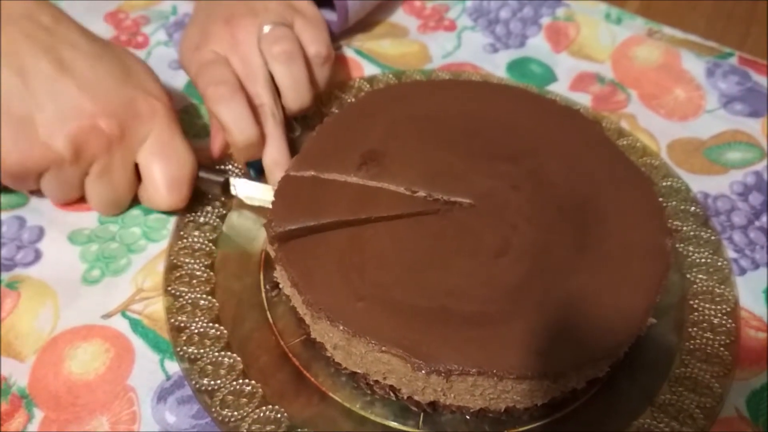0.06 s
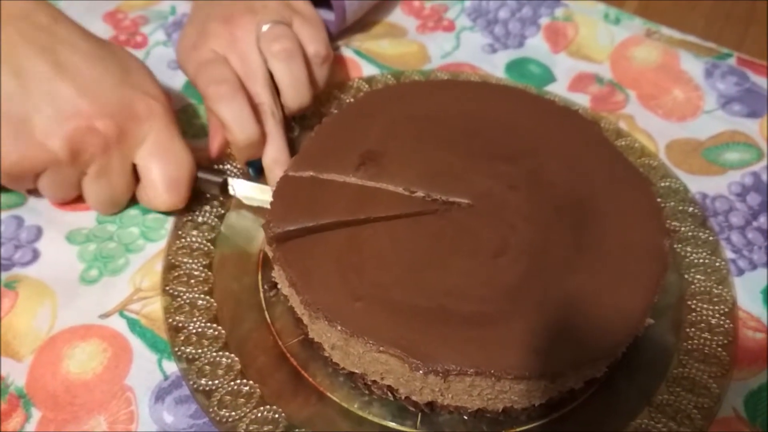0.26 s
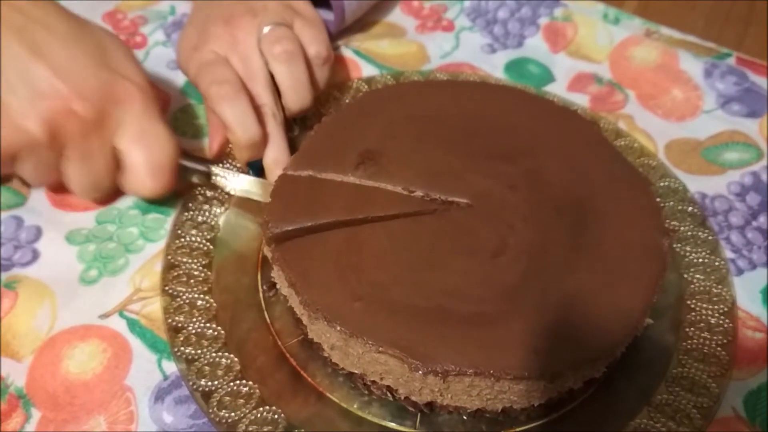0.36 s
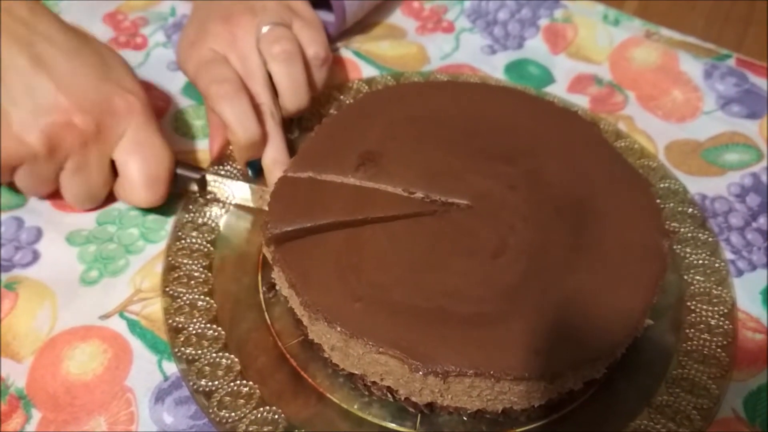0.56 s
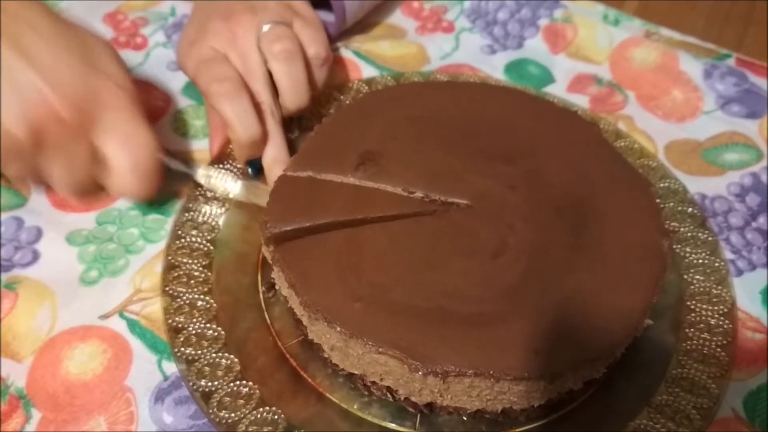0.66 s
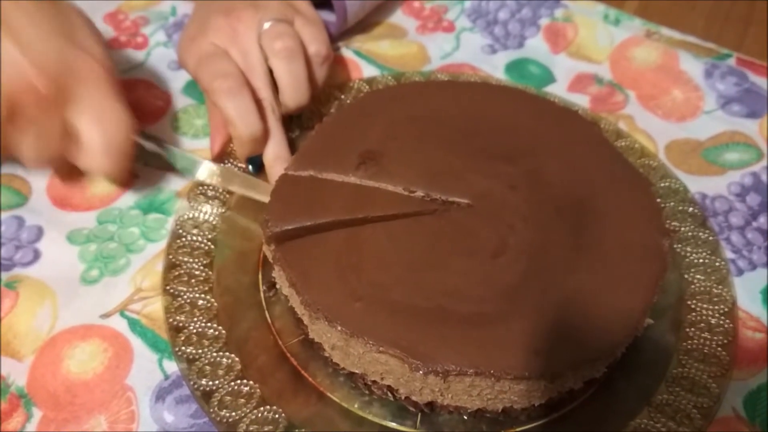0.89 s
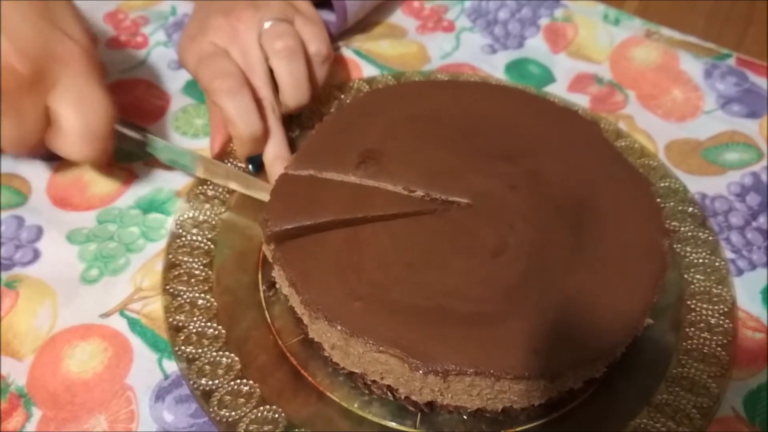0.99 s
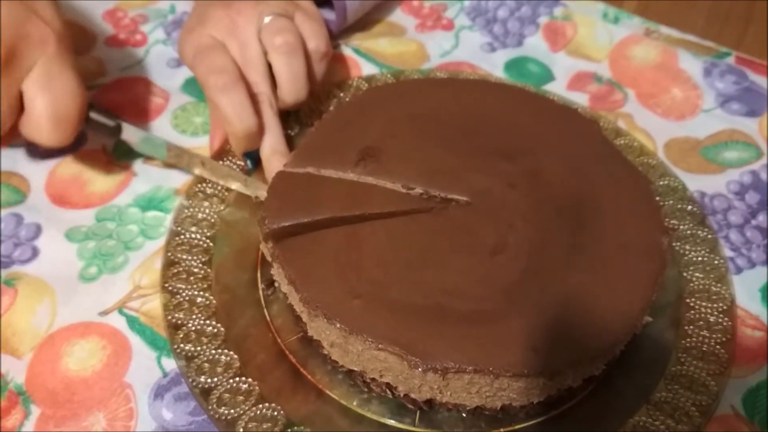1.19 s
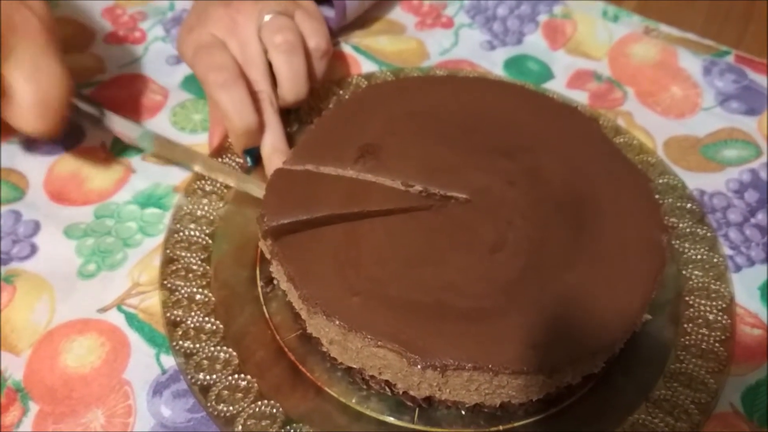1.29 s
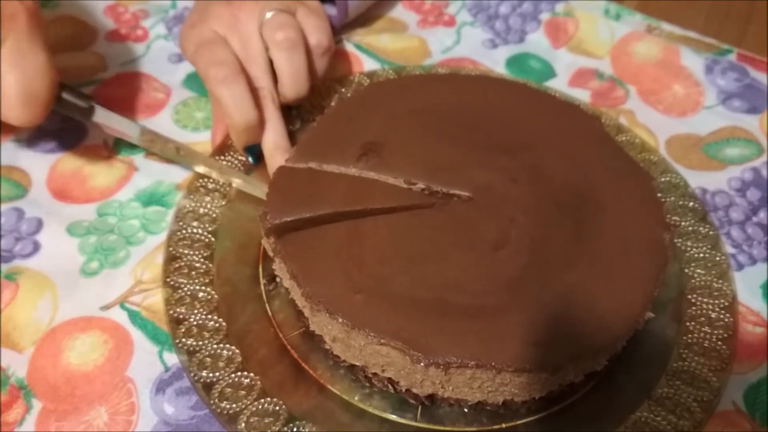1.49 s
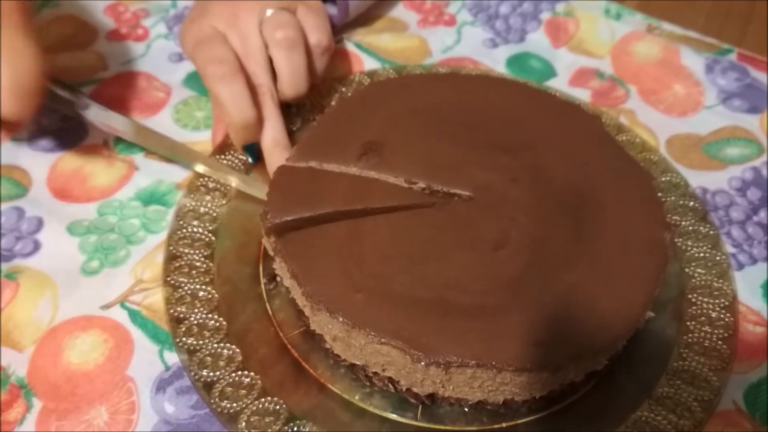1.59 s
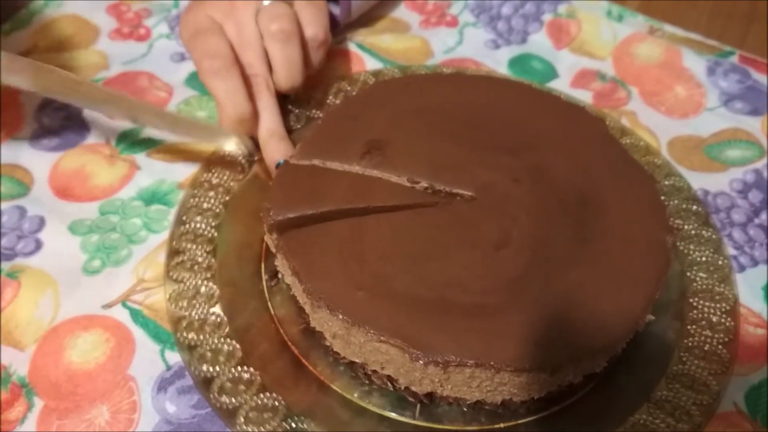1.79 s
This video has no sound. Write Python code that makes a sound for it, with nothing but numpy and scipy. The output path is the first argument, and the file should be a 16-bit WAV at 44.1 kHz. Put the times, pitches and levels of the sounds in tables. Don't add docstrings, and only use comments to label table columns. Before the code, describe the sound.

A knife crunches through a crisp cake base, close up in stereo. Bright cracks and gritty crumbs start around 0.1 seconds, thickening to the heaviest crunch with a low thud at 0.5. After a short lull, snaps resume at 0.67, burst again at 1.0, and thin out by 1.45. Faint blade slides, tiny flakes and a distant knock near 1.7 follow, over low household rumble and short room reflections.

```python
import sys
import numpy as np
from scipy import signal
from scipy.fft import rfft, irfft, next_fast_len
from scipy.io import wavfile
from scipy.ndimage import uniform_filter1d, map_coordinates

SR = 44100
rng = np.random.default_rng(int(sys.argv[2]) if len(sys.argv) > 2 else 0)


def transcribe(signal):
    frames = np.atleast_2d(signal).T
    limited = np.clip(frames, -1, 1)
    pcm = np.round(limited * 32767).astype(np.int16)
    wavfile.write(sys.argv[1], SR, pcm)


def elevation(decibels):
    levels = np.asarray(decibels, float)
    return 10 ** (levels / 20)


N = 81585
RISE_S = 0.00039


def unit(x):
    return x / np.sqrt(np.mean(x ** 2) + 1e-20)


def along(points, hz):
    f, v = np.transpose(points)
    return np.interp(np.log(hz + 1), np.log(f + 1), v)


def level(rows):
    return elevation(np.interp(np.arange(N) / SR, *np.transpose(rows)))


def unit_gain(h):
    return h / np.sqrt(np.mean(np.abs(h) ** 2))


def filtered(x, response):
    size = next_fast_len(N + SR // 2)
    gain = unit_gain(response(np.fft.rfftfreq(size, 1 / SR)))
    return irfft(rfft(x, size) * gain, size)[..., :N]


def colour(points):
    return lambda hz: elevation(along(points, hz))


def ringing(peaks):
    def response(f):
        total = 0
        for k, (centre, width, db) in enumerate(peaks):
            damping = 1j * f * width
            total = total + (-1) ** k * elevation(db) * damping / (centre * centre - f * f + damping)
        return total
    return response


def wobble(rate):
    knots = rng.standard_normal(int(N * rate / SR) + 4)
    return map_coordinates(knots, [np.arange(N) * rate / SR])


def bursts(rows, rise_s):
    power, t = np.zeros(N + SR), np.arange(SR // 4) / SR
    for s, db, t60 in rows:
        fall = elevation(db - 60 * t / max(t60, .002))
        power[round(s * SR):][:len(t)] += (fall * (1 - np.exp(-t / rise_s))) ** 2
    return np.sqrt(power[:N])


def patchy(x, patchy_db, size=128):
    z = signal.stft(x, nperseg=size)[2]
    field = uniform_filter1d(rng.standard_normal(z.shape[1:]), 6, 0)
    field = uniform_filter1d(field, 4, 1)
    return signal.istft(z * elevation(patchy_db * unit(field)), nperseg=size)[1][:, :N]


# frequency in Hz, left minus right in dB.
LEFT_LEAN = [(200, 0.5), (700, -2), (2400, 3.5), (6000, -1), (9500, -5), (13000, -3)]
# frequency in Hz, likeness from 0 to 1.
LIKENESS = [(100, 0.87), (300, 0.87), (1000, 0.47), (12000, 0.057)]
LEFT_LAG_S, LAG_FROM_HZ = 0.0003355, 1675


def pair(env, blows=0):
    hz = np.fft.rfftfreq(N, 1 / SR)
    turn = np.arccos(np.clip(along(LIKENESS, hz), 0, 1)) / 2
    a, b = rfft(env * rng.standard_normal((2, N)))
    mid, side = a * np.cos(turn), b * np.sin(turn)
    sure = rfft(blows + np.zeros(N))
    lean = elevation(along(LEFT_LEAN, hz) / 2)
    lag = LEFT_LAG_S * (0.3 + 0.61 / (1 + (LAG_FROM_HZ / (hz + 1)) ** 6))
    left = (mid + side + sure) * lean * np.exp(-2j * np.pi * hz * lag)
    right = (mid - side + sure) / lean
    return irfft([left, right], N)


# frequency in Hz, level in dB per Hz.
RUMBLE_COLOUR = [(25, -29), (65, 1), (110, -5), (215, -6), (330, -9.5), (400, -28), (560, -39.5),
                 (700, -77.5)]
# frequency in Hz, level in dB per Hz.
HISS_COLOUR = [(350, -29), (500, 0), (900, -14.5), (1600, -18.5), (2700, -16.5), (16500, -16)]
# frequency in Hz, width in Hz, level in dB.
FAR_OBJECT = [(692, 110, 3), (1310, 290, -3.5), (2150, 350, -6.5), (2770, 360, -9.5), (3170, 300, -11)]
RUMBLE_DB, HISS_DB = -68.5, -89.5
KNOCK_S, KNOCK_DB, KNOCK_T60_S, KNOCK_LEAD_S, KNOCK_BLOW_DB = 1.702, -64.5, 0.26, 0.025, 23.5


def household():
    a, b = rng.standard_normal((2, N))
    rumble = filtered(np.array([a + b, a - 0.08 * b]), colour(RUMBLE_COLOUR))
    rumble = rumble * elevation(RUMBLE_DB + 0.67 * wobble(13))
    hiss = elevation(HISS_DB) * filtered(rng.standard_normal((2, N)), colour(HISS_COLOUR))
    after = np.arange(N) / SR - KNOCK_S
    scrape_db, echo_db = 20 * after / KNOCK_LEAD_S - 4, -60 * after / KNOCK_T60_S
    force = elevation(KNOCK_DB + np.where(after < 0, scrape_db, echo_db)) * rng.standard_normal((2, N))
    force[:, round(KNOCK_S * SR)] += elevation(KNOCK_DB + KNOCK_BLOW_DB)
    return rumble + hiss + filtered(force, ringing(FAR_OBJECT))


# frequency in Hz, time to fall 60 dB in seconds.
ROOM_DECAY = [(100, 0.12), (1000, 0.17), (12000, 0.042)]
ROOM_DB, WALL_S, ROOM_WIDE_HZ, ECHO_EACH_S = -11, 0.0048, 958, .04


def kitchen(x):
    out, size, mono = np.zeros((2, N + SR)), round(ECHO_EACH_S * SR), x.mean(axis=0)
    for start in range(0, N, size):
        hz, t, z = signal.stft(rng.standard_normal((2, SR // 4)), SR, nperseg=256)
        turn = np.arctan(hz / ROOM_WIDE_HZ + .1)[:, None] / 2
        mid, side = z[0] * np.cos(turn), z[1] * np.sin(turn)
        decay = elevation(-60 * t / along(ROOM_DECAY, hz)[:, None])
        tail = signal.istft(np.array([mid + side, mid - side]) * decay, SR, nperseg=256)[1]
        tail = tail / np.linalg.norm(tail[0])
        answer = signal.fftconvolve(mono[None, start:start + size], tail, axes=1)
        out[:, start + round(WALL_S * SR):][:, :answer.shape[1]] += answer
    return out[:, :N]


# start in seconds, peak level in dB, pitch in Hz.
HAND_PUSHES = [(0.126, -41, 132), (0.214, -31, 284), (0.324, -33, 239), (0.445, -33.5, 206.5),
               (0.517, -25.5, 164.6), (0.704, -38, 147), (0.808, -37, 181), (0.931, -41.5, 143),
               (0.95, -34, 183), (1.04, -40.5, 169), (1.149, -41.5, 227), (1.177, -39.5, 118),
               (1.247, -36.5, 247)]
THUD_CYCLES = 5.5
SWAY_HZ, SWAY_DB, SWAY_T60_S = 69, -18.5, 0.09


def table():
    out, t = np.zeros(N + SR), np.arange(SR // 4) / SR
    sway = elevation(SWAY_DB - 60 * t / SWAY_T60_S) * np.sin(2 * np.pi * SWAY_HZ * t)
    for s, db, hz in HAND_PUSHES:
        thud = elevation(-60 * t * hz / THUD_CYCLES) * np.sin(2 * np.pi * hz * t)
        out[round(s * SR):][:len(t)] += elevation(db) * (thud + sway) * (1 - np.exp(-t / 0.0022))
    return np.array([np.roll(out[:N], round(LEFT_LAG_S * SR)), out[:N]])


# time in seconds, level in dB.
SLIDE = [(0, -65.5), (.06, -79), (.08, -100), (1.45, -100), (1.52, -76.5), (1.57, -88), (1.6, -80),
         (1.64, -88), (1.655, -72.5), (1.715, -75.5), (1.75, -83.5), (1.85, -99)]
# frequency in Hz, width in Hz, level in dB.
BLADE_BANDS = [(2770, 450, -9), (5430, 960, -9), (7600, 700, -7.5), (9150, 380, -5.5), (10400, 600, -1.5),
               (11400, 380, 0), (12300, 700, -4.5), (13600, 630, -4.5), (15200, 400, -5.5)]
# start in seconds, peak level in dB.
LAST_FLAKES = [
    (1.5813, -67),
    (1.589, -60),
    (1.6755, -70),
    (1.7076, -68),
    (1.7226, -70),
]


def wipe():
    flakes = bursts([(s, db, .006) for s, db in LAST_FLAKES], RISE_S)
    thin = colour([(7000, -28), (11500, 1.5), (15500, -3.5), (16500, -30)])
    hiss = filtered(pair(level(SLIDE)), lambda hz: ringing(BLADE_BANDS)(hz) ** 2)
    return patchy(hiss, patchy_db=3.0) + filtered(pair(flakes), thin)


CRUMBS_PER_S, CRUMB_DB, CRUMB_S = 2500, 5, 0.0018


def crumbs():
    sizes = elevation(CRUMB_DB * np.minimum(rng.exponential(size=N), 2.5))
    hits = (rng.random(N) < CRUMBS_PER_S / SR) * sizes
    t = np.arange(SR // 50) / SR
    return unit(np.convolve(hits, np.exp(-t / CRUMB_S))[:N] + .5)


# peak time in seconds, level in dB, plate share in dB,
# swell in seconds, time to fall 60 dB in seconds.
LONG_TEARS = [(0.09, -61, -3, 0.037, 0.13), (0.124, -55.5, 3.5, 0.008, 0.11), (0.218, -39, -10, 0.02, 0.11),
              (0.377, -47.5, -4, 0.037, 0.21), (0.426, -52.5, 3.5, 0.019, 0.1),
              (0.469, -41, -12.5, 0.011, 0.017), (0.519, -33.5, -4, 0.03, 0.14),
              (0.711, -48.5, -6.5, 0.042, 0.086), (0.818, -64, 4.5, 0.23, 0.39),
              (0.873, -52.5, 6.5, 0.0018, 0.0106), (0.963, -69.5, 17, 0.035, 0.19),
              (1.017, -48.5, -6.5, 0.055, 0.14), (1.189, -60, 0, 0.1, 0.21), (1.427, -63.5, -9, 0.013, 0.3)]


def tears():
    t = np.arange(N) / SR
    s, db, share_db, swell, t60 = np.transpose(LONG_TEARS)[:, :, None]
    swell_db = 20 * (t - s) / np.maximum(swell, .002)
    fall_db = -60 * (t - s) / np.maximum(t60, .01)
    each = elevation(db + np.where(t < s, swell_db, fall_db))
    return each.sum(axis=0), (each * elevation(share_db)).sum(axis=0)


PLATE_DB, PLATE_HOLD_S, BLOW_DB = -4, 0.008, 18


def drive(cracks, load):
    s, db, share_db, t60 = np.transpose(cracks)
    blow_at = np.round((s + RISE_S) * SR).astype(int)
    blows = np.bincount(blow_at, elevation(db + share_db + BLOW_DB), N)
    shudder = bursts(np.transpose([s, db + share_db + PLATE_DB, t60 / 2 + PLATE_HOLD_S]), RISE_S)
    return pair(shudder + load * crumbs(), blows)


# frequency in Hz, width in Hz, level in dB.
FIRM_PLATE = [(600, 40, -8), (740, 70, -11), (878, 150, 0), (1065, 170, -2), (1335, 130, -6),
              (1580, 150, -7), (2140, 120, -15), (2500, 300, -15), (2840, 120, -15)]
# frequency in Hz, width in Hz, level in dB.
SLACK_PLATE = [(581, 210, -2.5), (696, 140, 1), (976, 410, -7), (2360, 510, -16.5)]
BITE_S = .19
DULL_DB = -4


def plate(cracks, load):
    firm = (cracks[:, 0] > BITE_S) & (cracks[:, 0] < DRAW_CRACKS[0][0])
    high = filtered(drive(cracks[firm], load / 2), ringing(FIRM_PLATE))
    low = elevation(DULL_DB) * filtered(drive(cracks[~firm], load), ringing(SLACK_PLATE))
    return patchy(high + low, patchy_db=1.2, size=512)


# frequency in Hz, level in dB per Hz.
CRACK_COLOUR = [(880, -20.5), (1500, -6.5), (2600, -12.5), (3740, -10), (6430, -2), (8680, -6),
                (12000, 6.5), (15200, -1), (16500, -50)]
# frequency in Hz, level in dB per Hz.
CRUMB_COLOUR = [(880, -43), (1500, -10.5), (2290, -3), (6050, -15), (11200, -5), (15900, -10),
                (16500, -43.5)]
CRACK_DB, SPIKY_DB = -1.5, 1.2


def crisp_base(cracks, grinding):
    snap = bursts(cracks[:, [0, 1, 3]], RISE_S) * elevation(CRACK_DB + SPIKY_DB * wobble(900))
    snaps = filtered(pair(snap), colour(CRACK_COLOUR))
    rustle = filtered(pair(grinding * crumbs()), colour(CRUMB_COLOUR))
    return patchy(snaps + rustle, patchy_db=1.5)


# start in seconds, peak level in dB, plate share in dB,
# time to fall 60 dB in seconds.
PUSH_CRACKS = [(.0015, -51.5, -26, .008), (.069, -73, 16.5, .02), (0.0725, -46, -11, .012),
               (0.0798, -47, -32, .017), (0.1078, -28, -48, .007), (0.1229, -46.5, -8.5, .01),
               (.1262, -32.5, -21, .008), (0.134, -37, -39, .007), (.166, -61, 10, .01),
               (0.173, -63, 5, .01), (0.1958, -32.5, -14, .012), (.2075, -39.5, -10, .015),
               (0.2167, -29, -8, .012), (.283, -60, 3, .01), (0.289, -59, 6.5, .01),
               (0.317, -51.5, -13.5, .01), (0.3472, -38.5, -20.5, .026), (0.3567, -40.5, -20.5, .02),
               (0.364, -45.5, -12, .015), (.3865, -48, -6, .008), (.399, -29, -9, .008),
               (.402, -38, -6, .008), (.42, -39.5, -2, .01), (0.4258, -41.5, -7.5, .008),
               (0.427, -46, -7.5, .008), (0.4445, -38.5, -12, .008), (0.4543, -35.5, 0, .015),
               (.464, -34, -11.5, .008), (0.4659, -33.5, -14.5, .008), (0.4997, -31, -9.5, .02),
               (0.5137, -35, -5, .01), (.5183, -22, 5, .008), (.5305, -34.5, -0.5, .01),
               (.5395, -34.5, 0.5, .01), (.547, -39, 2, .01), (0.556, -42, -1, .01),
               (.653, -47.5, -27.5, .008)]
# start in seconds, peak level in dB, plate share in dB,
# time to fall 60 dB in seconds.
DRAW_CRACKS = [(.671, -28, -17, 0.0072), (.674, -29.5, -21, 0.0099), (.6767, -39, -32, 0.011),
               (.6965, -36.5, -14, 0.0074), (.702, -34, -6, 0.0094), (.7048, -37, -23, 0.013),
               (.7273, -36.5, -11.5, .004), (.767, -62, 13, 0.011), (.7725, -62, 10, 0.0083),
               (.8143, -50, -17, 0.008), (.8452, -46.5, 3.5, .006), (.8667, -45.5, -7, 0.01),
               (.8705, -41, -10.5, 0.0081), (.8775, -57, -15, .008), (.905, -48.5, -18, 0.011),
               (.9305, -62, 9, .01), (.9595, -51.5, 11, 0.011), (.9625, -36.5, -25, 0.0084),
               (.9716, -51, -15, 0.0071), (.9746, -39, -21, 0.0089), (.998, -39.5, 1, 0.014),
               (1.0017, -25, -10.5, 0.0051), (1.0086, -29, -12, 0.0092), (1.018, -35.5, -16, 0.017),
               (1.0335, -32.5, -31, 0.013), (1.0722, -45, -26, 0.017), (1.1186, -43, -22, 0.0047),
               (1.127, -68, 10, 0.011), (1.1465, -39.5, -17, 0.014), (1.1497, -33.5, -26, 0.0061),
               (1.153, -44, -18, .01), (1.1748, -35, -13.5, 0.021), (1.1965, -59.5, 14.5, 0.0098),
               (1.2065, -38, -17, 0.014), (1.2577, -31.5, -28.5, 0.0081), (1.2864, -49, -17, .008),
               (1.3113, -37.5, -28, 0.013), (1.3147, -42, -15, 0.026), (1.323, -46.5, -8, 0.029),
               (1.3668, -37.5, -23.5, 0.0044), (1.4036, -49.5, -34, 0.0082), (1.4132, -43, -25, .006),
               (1.4225, -42, -14, 0.017), (1.426, -37.5, -24.5, 0.0089), (1.4322, -39, -15.5, .008),
               (1.4516, -49.5, -22.5, .008)]
# time in seconds, pressure in dB.
GRIND_PRESSURE = [(0, -67), (.065, -95), (.075, -63.5), (.18, -63), (.3, -62.5), (.62, -71), (.665, -70.5),
                  (.69, -61.5), (.78, -60), (.86, -71), (.94, -73.5), (1.05, -60.5), (1.14, -75.5),
                  (1.24, -66.5), (1.3, -65), (1.38, -66.5), (1.55, -96), (1.85, -100)]
# frequency in Hz, width in Hz, level in dB.
TABLE_BODY = [(64, 22, -4), (120, 40, -7), (166, 25, 0), (213, 30, -2), (320, 55, -9)]
GRIND_SHARE_DB, SHAKE_DB = -8, -0.5


def knife():
    cracks = np.array(PUSH_CRACKS + DRAW_CRACKS)
    pressure = level(GRIND_PRESSURE)
    tear, load = tears()
    load = load + pressure * elevation(GRIND_SHARE_DB)
    shake = elevation(SHAKE_DB + 0.22 * wobble(30)) * load
    shaken_table = filtered(pair(shake), ringing(TABLE_BODY))
    return crisp_base(cracks, tear + pressure) + plate(cracks, load) + shaken_table


def scene():
    near = knife() + table() + wipe()
    return near + elevation(ROOM_DB) * kitchen(near) + household()


def roll_off(x):
    return signal.sosfilt(signal.butter(12, 16960, fs=SR, output="sos"), x)


LOW_CUT_HZ, TOP_HZ, FADE_FROM_S, FADE_DB = 58, 16300, 1.68, -5.5


def record(dry):
    cut = signal.sosfilt(signal.butter(2, LOW_CUT_HZ, "highpass", fs=SR, output="sos"), dry)
    cut = irfft(rfft(cut) * (np.fft.rfftfreq(N, 1 / SR) < TOP_HZ), N)
    mix = cut * level([(FADE_FROM_S, 0), (N / SR, FADE_DB)])
    return roll_off(mix)


dry = scene()
out = record(dry)
transcribe(out)
```